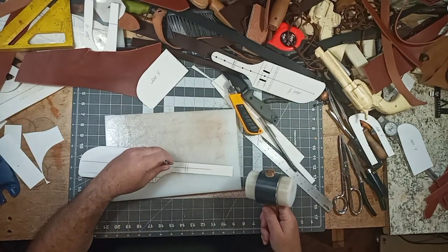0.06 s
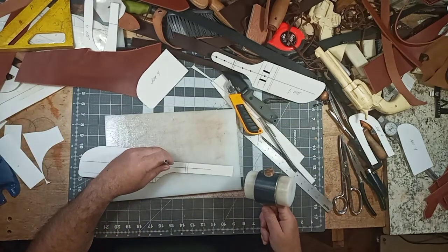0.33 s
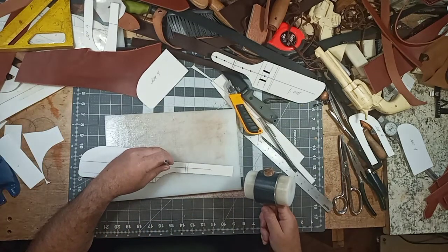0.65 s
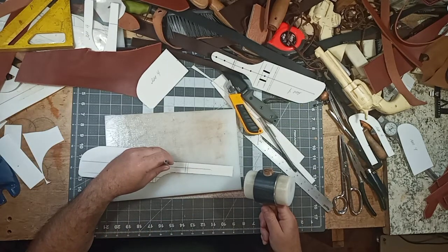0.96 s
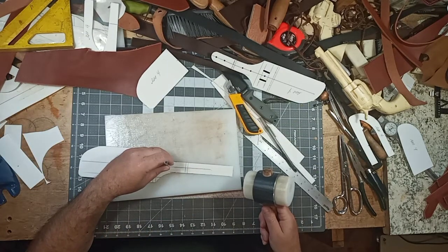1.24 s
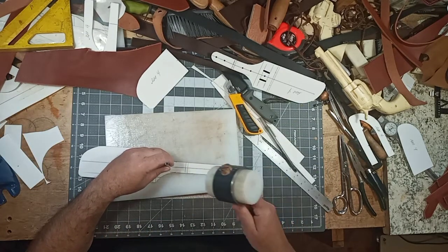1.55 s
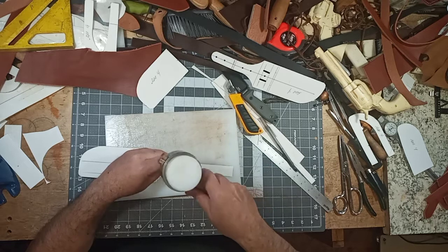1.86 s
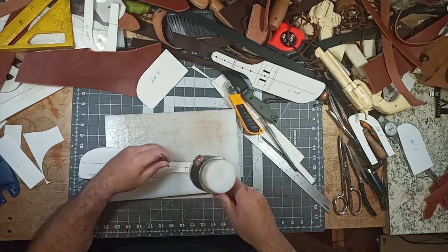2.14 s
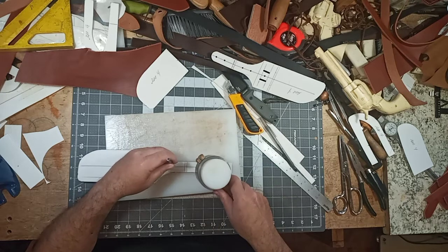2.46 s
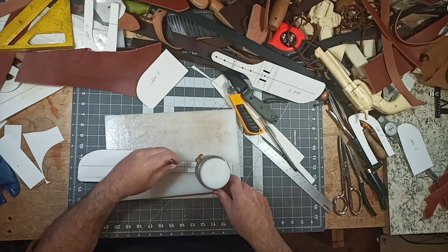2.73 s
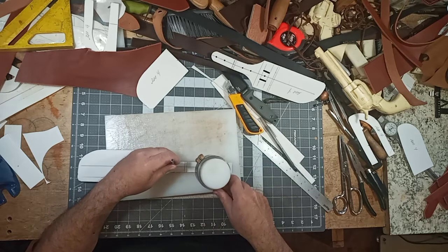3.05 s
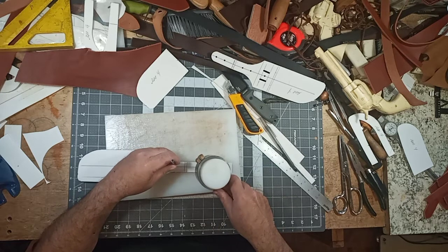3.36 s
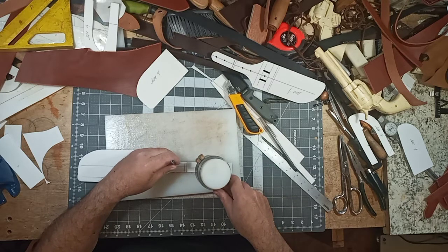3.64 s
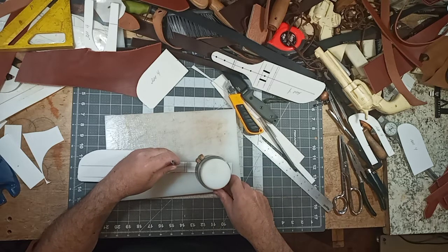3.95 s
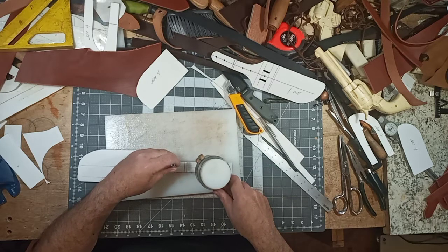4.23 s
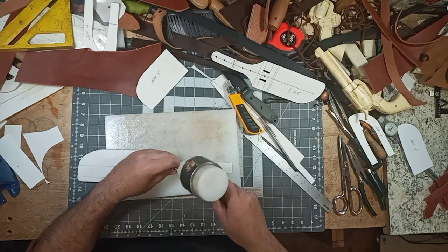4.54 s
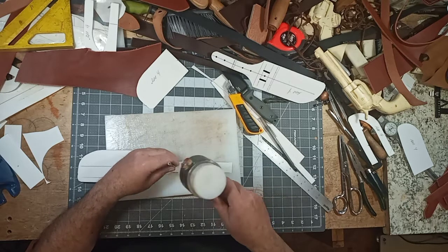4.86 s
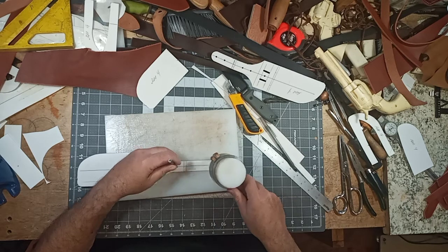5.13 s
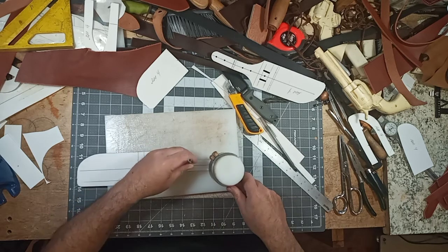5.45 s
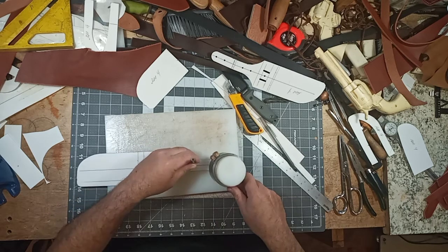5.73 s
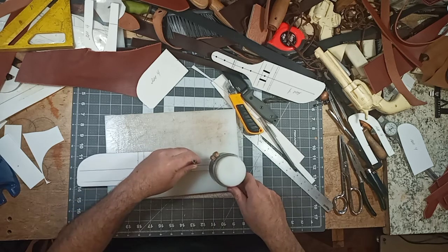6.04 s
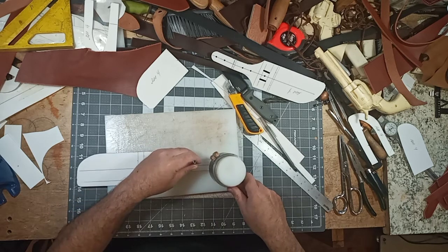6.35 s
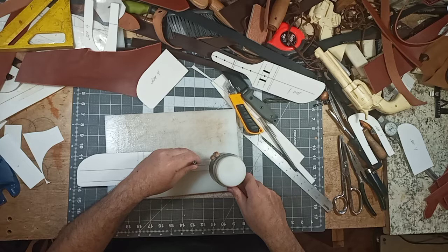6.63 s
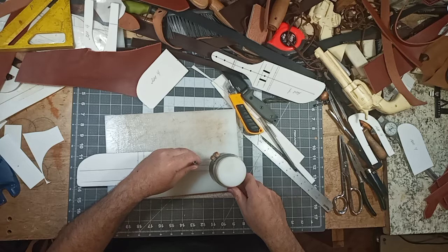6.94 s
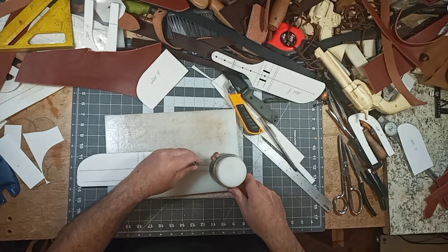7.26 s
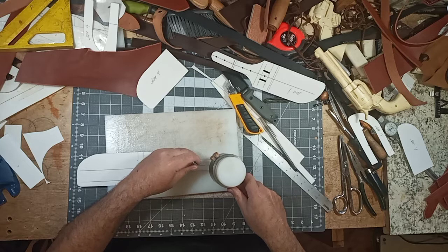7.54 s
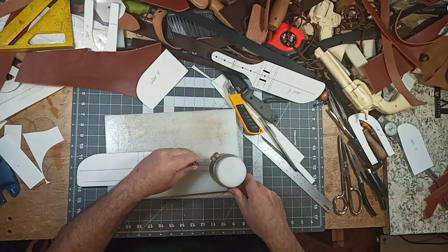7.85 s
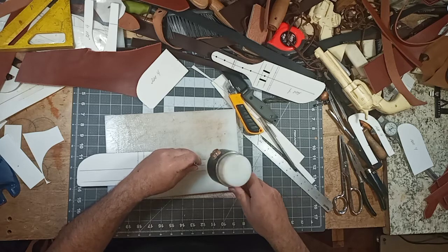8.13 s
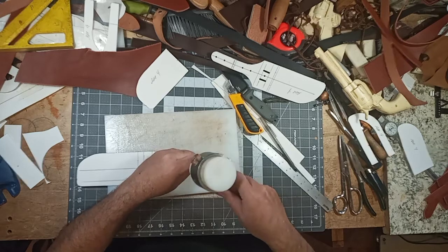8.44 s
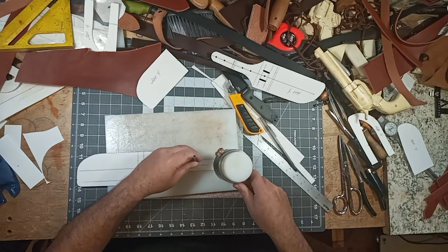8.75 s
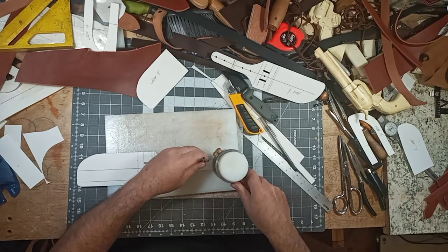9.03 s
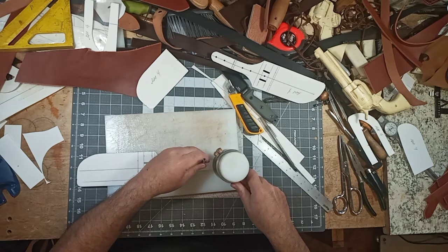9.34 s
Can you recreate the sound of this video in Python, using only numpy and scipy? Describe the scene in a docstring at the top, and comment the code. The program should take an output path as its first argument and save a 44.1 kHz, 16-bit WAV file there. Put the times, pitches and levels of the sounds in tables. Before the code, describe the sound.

A mallet strikes a steel punch through leather three times, with softer knocks as it is set down, over a faint fan hum.

```python
"""A mallet drives a steel hole punch through leather: three hard blows on a bench in a small workshop.
Each cracks, thumps the bench and shakes loose tools; then the mallet is stood back on the bench
and the punch is worked free with faint ticks. Across the room a fan hums and hisses, its whine
swelling about twice a second.
A microphone pair hears the bench; the left channel is slightly later and mostly louder."""
import sys
import numpy as np
from scipy import signal
from scipy.fft import rfft, irfft
from scipy.io import wavfile
from scipy.ndimage import uniform_filter1d

SR = 44100
rng = np.random.default_rng(int(sys.argv[2]) if len(sys.argv) > 2 else 0)


def master(y):
    """Save y as 16-bit WAV."""
    cut = np.clip(np.atleast_2d(y).T, -1, 1)
    pcm = np.round(cut * 32767)  # scale
    wavfile.write(sys.argv[1], SR, pcm.astype(np.int16))


N = 418420
T = np.arange(SR) / SR  # the second that follows a contact

# Levels are relative within each column; t60 is the time to fall 60 dB.
# mallet on punch: t/s, crack/dB, contact corner/Hz, bench thump/dB, room/dB, bottoming/dB,
# rebound delay/s, rebound/dB, board's note at that spot/Hz, its level/dB
MALLET_BLOWS = [(1.644, 4, 9000, -0.5, 1.5, -19, 0.051, -12.5, 153, -17),
                (4.5103, 3.5, 7000, -1.5, 1.5, -3.5, 0.046, -9.5, 174, -26),
                (8.2184, 2, 7900, 1, 3.5, -12, 0.039, -11, 284, -10)]
# tone colour of a blow's crack at the bench: f/Hz, level/dB
CRACK_COLOUR = [(88, -18), (130, 1), (175, -9), (240, -2), (309, -4), (1390, -19.5), (1900, -12),
                (2980, -24.5), (4860, -27), (5460, -25.5), (7470, -23.5), (8230, -32.5), (10400, -43),
                (12900, -35), (14800, -44), (16000, -59)]
# tone colour of the room's answer to a blow: f/Hz, level/dB
ANSWER_COLOUR = [(59, 3.5), (100, 3.5), (174, -17), (271, -9), (365, -8.5), (424, -16), (471, -11.5),
                 (513, -17), (558, -10), (1650, -17.5), (5300, -32.5), (10700, -34), (13200, -36),
                 (16000, -56)]
# modes of the struck bench top: f/Hz, level/dB, t60/s
BENCH_MODES = [(90.5, -28, 0.076), (122, -15, 0.05), (241, -22.5, 0.17), (330, -9.5, 0.036),
               (404, -13, 0.07), (541.6, -21.5, 0.14)]
# long rings of bench and room: f/Hz, level/dB, t60/s
BOOM_MODES = [(59.5, -47, 1), (73.35, -27, 0.71), (82.4, -22, 0.075), (102.5, -36, 0.95), (153, -44, 0.15),
              (193, -25, 0.38), (224.2, -25.5, 0.19), (275, -33, 0.35), (347, -76, 0.12), (338, -46, 0.37),
              (471, -27, 0.21), (496, -24, 0.15), (525, -28.5, 0.44), (600, -76, 0.11), (797, -28.5, 0.22)]
# loose tools on the bench, shaken by a blow: f/Hz, level/dB, t60/s
TOOL_MODES = [(930, -37, .25), (1066, -39, .25), (1187, -40, .28), (1632, -39, .28), (1924, -36, .25),
              (2103, -41, .26), (2461, -43, .26)]
# mallet set down, and its rocking:
# t/s, knock/dB, contact corner/Hz, bench thump/dB, sway/dB, room/dB, treble share/dB
MALLET_LANDINGS = [(2.2020, -5.5, 340, -2, -14, -1.5, -21.5), (4.948, -5.5, 6000, -7, -8, -3, -3),
                   (5.0250, -15.5, 2800, -8.5, -17.5, -19, -4), (8.664, 1, 4480, -10.5, -8.5, -3.5, -19)]
# tone colour of the mallet's knock on the board: f/Hz, level/dB
KNOCK_COLOUR = [(60, -21), (120, -7), (195, -18), (330, -6.5), (550, -7), (900, -7.5), (1200, -16),
                (1750, -9.5), (2400, -22), (3800, -24), (5200, -33.5), (7200, -24.5), (9000, -36),
                (10600, -42), (13000, -56)]
# the bench, damped by the weight of the resting mallet: f/Hz, level/dB, t60/s
LOADED_MODES = [(51, -27, 0.25), (68.8, -16.5, 0.23), (89.6, -25, 0.24), (126.5, -39, 0.12),
                (138.5, -30, 0.38), (217, -34, 0.13), (352, -27, 0.22)]
# small contacts of punch and leather: t/s, level/dB, centre f/Hz, t60/s
PUNCH_TICKS = [(2.094, -53, 7200, 0.18), (2.1968, -43.5, 7100, 0.11), (4.734, -49.5, 13000, 0.058),
               (4.85, -50.5, 10000, 0.055), (4.958, -33, 11600, 0.019), (8.436, -38.5, 14400, 0.027),
               (8.673, -46, 10600, 0.022)]
# the fan's air noise, mostly below 2 kHz: f/Hz, level/dB
DRONE_COLOUR = [(30, -49), (66, -7), (105, -12.5), (160, -18.5), (205, -7.5), (270, -5.5), (330, -10),
                (450, -20), (680, -16), (1000, -22.5), (1750, -15.5), (2400, -18), (3100, -53),
                (5000, -100)]
# the fan's air noise, mostly above 2 kHz: f/Hz, level/dB
HISS_COLOUR = [(1410, -14), (2400, -20), (2540, -4), (3120, -5), (3490, -4), (4980, -8.5), (7410, 2.5),
               (8150, -1.5), (9250, -18.5), (10600, -7.5), (10900, -9.5), (12600, -23), (13800, -24),
               (15200, -9.5), (16000, -17)]
# resonances that the fan's air stirs: f/Hz, level/dB, width/Hz
FAN_RESONANCES = [(304.4, -67, 29), (520.6, -81, 8.7), (636, -71, 49), (907, -69.5, 120), (1743, -68.5, 65),
                  (1986, -73, 66), (3093, -71, 93)]
# tones of the fan's motor and blades: f/Hz, level/dB
MOTOR_TONES = [(206.3, -69), (240, -64), (309.4, -68), (325.6, -76), (360, -74), (515.8, -79), (635.8, -79)]
# swells of the motor's whine: peak t/s, level/dB, width at half height/s
SWELLS = [(0.55, -57, 0.14), (1.248, -54.5, 0.23), (1.556, -62.5, 0.27), (2.157, -55.5, 0.097),
          (2.57, -56.5, .13), (2.955, -58.5, 0.14), (3.508, -59, 0.11), (3.975, -55.5, .2),
          (4.424, -64, 0.14), (4.893, -57, 0.14), (5.28, -55.5, .22), (5.73, -56.5, 0.16),
          (6.16, -62, 0.083), (6.708, -56, 0.089), (7.045, -60.5, 0.24), (7.48, -58.5, .16),
          (7.88, -63.5, 0.21), (8.11, -55.5, 0.093), (8.506, -61, 0.11), (9.03, -63, 0.1),
          (9.432, -61.5, 0.1)]
# brief surges of the fan's resonances: peak t/s, f/Hz, level/dB, width at half height/s
FAN_SURGES = [(0.41, 305, -53, .08), (0.54, 307, -52, .04), (0.80, 298, -53.5, .04),
              (1.99, 1990, -65.5, .18), (2.44, 305, -54, .07), (2.754, 308, -53.5, .1),
              (3.287, 310, -53, .04), (3.60, 302, -54.5, 0.056), (3.91, 300.4, -50, 0.094),
              (4.45, 312, -52, .04), (4.90, 300, -51, 0.044), (5.22, 3120, -65, .2),
              (5.868, 304.4, -55.5, .07), (6.079, 309, -52.5, .04), (6.23, 3140, -64, .11),
              (6.56, 310, -48.5, 0.047), (6.58, 3100, -64, 0.15), (8.54, 3110, -64, 0.2),
              (8.798, 304, -53, .05), (8.87, 512, -60, .09)]
# ring time of the workshop: f/Hz, t60/s
ROOM_T60 = [(60, 0.4), (250, 0.26), (700, 0.2), (2000, 0.2), (5000, 0.22), (9000, 0.22), (15000, 0.1)]
# the bench at the microphones, left minus right: f/Hz, level/dB
BENCH_BALANCE = [(60, 5), (200, 2), (600, 3.5), (1200, 4), (2400, 8), (4200, 4.5), (5500, 2), (7600, 19),
                 (8500, 6), (9400, 5), (10600, -19), (12200, -7), (15000, 0)]
# the fan at the microphones, left minus right: f/Hz, level/dB
FAN_BALANCE = [(60, 5.5), (200, 6), (310, 1), (720, 7.5), (1300, 5), (2000, 6.5), (3200, 7), (5000, 5),
               (7500, 21.5), (8500, 33), (9400, -13), (10600, -9.5), (12200, -8), (14500, 5)]
# the microphone ports colour the ticks' top octave: f/Hz, level/dB
MIC_PORT_COLOUR = [(7500, 3.5), (9000, -10), (10600, 7.5), (13000, -10), (15200, 2)]

REBOUND_THUMP_DB, BOARD_T60_S = 3, 0.11
DRONE_DB, HISS_DB = -58.5, -57
WOBBLE_DB, WOBBLE_BELOW_HZ = 2.2, 580
WHINE_HZ, WHINE_REST_DB = 720, -68
WHINE_AIR_HZ, WHINE_AIR_DB = 731, -6  # rough air that swells with the whine
ROTOR_HZ, FLUTTER_DB = 17.1, 3.5
SURGE_WANDER = 0.0131  # share of the pitch
BAND_LIMIT_HZ = 16000


def blows(walls):
    """Close by, the punch cuts through, bottoms on the board and rebounds; the bench thumps and booms."""
    out = np.zeros((2, N))
    bottoming = np.interp(T - .0065, T, fade(t60=0.0037), left=0)
    rings = ring(BOOM_MODES, rise_s=0.0071) + amp(1.5) * ring(TOOL_MODES, rise_s=0.0064)
    top = mic_pair(stereo(ring(BENCH_MODES, rise_s=0.002)), lag_ms=1.27)
    thump = top + mic_pair(stereo(rings), lag_ms=0.84)
    for (s, db, corner_hz, thump_db, room_db, bottom_db,
         rebound_s, rebound_db, board_hz, board_db) in MALLET_BLOWS:
        soft_db = softened(corner_hz, treble_db=-18)
        crack_db = db + 9 + read(CRACK_COLOUR, bins(T)) + soft_db
        answer_db = room_db + 2 + read(ANSWER_COLOUR, bins(T)) + soft_db
        rebound = np.interp(T - rebound_s, T, fade(t60=0.07), left=0)
        shape = fade(t60=0.061) + amp(bottom_db) * bottoming + amp(rebound_db - 2.5) * rebound
        add(out, s, contact(walls, shape, crack_db, answer_db, hold_s=0.11))
        add(out, s, amp(thump_db) * thump + steel_click(click_db=-45, spray_db=-36))
        board = ring([(board_hz, board_db, BOARD_T60_S)], rise_s=0.009)
        add(out, s, mic_pair(stereo(board), lag_ms=0.67))
        add(out, s + rebound_s, amp(rebound_db + REBOUND_THUMP_DB) * top)
    return out


def contact(walls, shape, crack_db, answer_db, hold_s):
    """A close crack with the given envelope and the room's answer, each with its colour (dB per bin)."""
    burst = noise_pair(SR, alike=0.91) * shape * (1 - np.exp(-T / 0.00019))
    # each contact reaches the walls a little differently
    paths = unit(walls + amp(3) * echoes(alike=0.37, uneven_db=3.5))
    tail = room_tail(paths, gap_s=0.0094, hold_s=hold_s, low_hz=127)
    direct = mic_pair(colour(burst, crack_db), lag_ms=0.98)
    return direct + mic_pair(colour(tail, answer_db), lag_ms=0.652)


def softened(corner_hz, treble_db, order=2):
    """A long contact loses the treble above its corner, down to the share the surfaces scrape up (dB)."""
    passed_power = 1 / (1 + (bins(T) / corner_hz) ** (2 * order))
    return 10 * np.log10(passed_power + amp(treble_db) ** 2)


def steel_click(click_db, spray_db):
    """The steel shank adds a very high click, which the room scatters."""
    upper = band(noise_pair(SR, alike=.3), hz=15100, octaves=0.089)
    lower = band(noise_pair(SR, alike=0.78), hz=10550, octaves=0.11)
    shape = amp(click_db) * fade(t60=0.0099) + amp(spray_db) * fade(t60=0.25)
    return mic_pair((upper + amp(-1.5) * lower) * shape, lag_ms=0.83)


def landings(walls):
    """The mallet's head knocks on the cutting board and stays there, so the bench sways and soon stops."""
    out = np.zeros((2, N))
    for s, db, corner_hz, thump_db, sway_db, room_db, treble_db in MALLET_LANDINGS:
        soft_db = softened(corner_hz, treble_db, order=4)
        knock_db = read(KNOCK_COLOUR, bins(T)) + soft_db
        knock = contact(walls, fade(t60=0.044), knock_db + db + 8, knock_db + room_db + 1, hold_s=0.0073)
        add(out, s, knock)
        thump = amp(thump_db) * ring(BENCH_MODES, rise_s=0.0016)
        sway = amp(sway_db + 8.5) * ring(LOADED_MODES, rise_s=0.027)
        add(out, s, mic_pair(stereo(colour(thump + sway, soft_db)), lag_ms=1.0))
    return out


def punch_ticks():
    """Close and faint, the punch ticks and scrapes as it is worked out of the leather."""
    out = np.zeros((2, N))
    for s, db, hz, t60 in PUNCH_TICKS:
        attack = 1 - np.exp(-T / (0.015 * t60))
        decay = fade(t60) + amp(-11.5) * fade(t60=0.18)
        scrape = band(noise_pair(SR, alike=0.27), hz, octaves=0.37)
        scrape = colour(scrape, read(MIC_PORT_COLOUR, bins(T)))
        add(out, s, mic_pair(amp(db) * attack * decay * scrape, lag_ms=0.75))
    return out


def fan():
    """Air noise, hum and whine from across the room; the low drone and the motor tones wobble together."""
    hz = np.fft.rfftfreq(N, 1 / SR)
    wobble = amp(WOBBLE_DB * drift(N, size=2000))
    drone = unit(irfft(rfft(noise_pair(N, alike=0.46)) * amp(read(DRONE_COLOUR, hz))))
    low_drone = irfft(rfft(drone) / (1 + (hz / WOBBLE_BELOW_HZ) ** 4))
    drone += (wobble - 1) * low_drone
    air = across_room(rng.standard_normal(N), wet_db=-4, t60=.15) + noise_pair(N, alike=.45)
    hiss = unit(irfft(rfft(air) * amp(read(HISS_COLOUR, hz))))
    hum = np.zeros(N)
    for centre_hz, db, width_hz in FAN_RESONANCES:
        peak = 1 / (1 + (2 * (hz - centre_hz) / width_hz) ** 2)
        hum += amp(db) * unit(irfft(rfft(rng.standard_normal(N)) * peak))
    motor = sum(amp(db) * tone(tone_hz, N) for tone_hz, db in MOTOR_TONES)
    hum += wobble * motor + whine()
    rush = mic_pair(amp(DRONE_DB) * drone + amp(HISS_DB) * hiss, lag_ms=0.662, balance=FAN_BALANCE)
    return rush + mic_pair(hum + surges(), lag_ms=0.42, balance=FAN_BALANCE)


def whine():
    """The motor's whine swells and sinks back, and flutters once per turn of the rotor."""
    t = np.arange(0, N / SR, .005)
    swells = sum(amp(db) * arch(t - s, width_s) for s, db, width_s in SWELLS)
    level = np.interp(np.arange(N) / SR, t, amp(WHINE_REST_DB) + swells)
    rotor_hz = ROTOR_HZ * (1 + 0.222 * drift(N, size=3000))
    flutter = amp(FLUTTER_DB * tone(rotor_hz, N) - 1.5)
    air = amp(WHINE_AIR_DB) * band(rng.standard_normal(N), WHINE_AIR_HZ, octaves=0.065)
    pitch_hz = WHINE_HZ + 4 * drift(N, size=400)
    return level * flutter * (tone(pitch_hz, N) + air)


def surges():
    """Now and then one of the fan's resonances swells and sinks back, wavering in pitch."""
    out = np.zeros((2, N))
    for s, hz, db, width_s in FAN_SURGES:
        pitch_hz = hz * (1 + SURGE_WANDER * drift(SR, size=300))
        surge = amp(db) * arch(T - width_s, width_s) * tone(pitch_hz, SR)
        add(out, max(s - width_s, 0), stereo(surge))
    return out


def across_room(x, wet_db, t60):
    """A distant source: its direct sound and each microphone's own reflections."""
    response = rng.standard_normal((2, SR)) * fade(t60)
    response *= amp(wet_db) / np.linalg.norm(response[0])
    response[:, 0] += 1
    return irfft(rfft(x) * rfft(response, N))


def echoes(alike, uneven_db):
    """Dense reflections off the workshop walls, uneven in strength."""
    lumps = unit(uniform_filter1d(rng.standard_normal(SR), size=40))
    return unit(noise_pair(SR, alike) * amp(uneven_db * lumps))


def room_tail(walls, gap_s, hold_s, low_hz):
    """Reflections above low_hz: strong while the first walls answer, then each band dies at its speed."""
    hz, t, spectra = signal.stft(walls, SR, nperseg=256)
    age = np.hypot(t, hold_s) - hold_s
    decay = np.exp(-np.log(1000) * age / read(ROOM_T60, hz)[:, None])
    tail = signal.istft(spectra * decay, SR, nperseg=256)[1][:, :SR]
    return low_cut(tail * (1 - np.exp(-(T / gap_s) ** 2)), low_hz)


def mic_pair(pair, lag_ms, balance=BENCH_BALANCE):
    """Long waves reach both microphones alike; the left channel is later and mostly louder."""
    hz, spectra = bins(pair), rfft(pair)
    apart = hz / np.hypot(hz, 350)
    mid = spectra.mean(0)
    spectra = mid + apart * (spectra - mid)
    lean = amp(read(balance, hz))
    left = lean * np.exp(-2j * np.pi * hz * lag_ms / 1000)
    gains = np.array([left, np.ones(len(hz))])
    return irfft(spectra * gains * np.sqrt(2 / (1 + lean ** 2)))


def ring(modes, rise_s):
    """Dying sines that take a moment to build up."""
    sines = sum(amp(db - 60 * T / t60) * np.sin(2 * np.pi * hz * T) for hz, db, t60 in modes)
    return sines * (1 - np.exp(-(T / rise_s) ** 2))


def tone(hz, samples):
    """A sine at rms 1 that follows a pitch or a pitch curve."""
    return np.sqrt(2) * np.sin(2 * np.pi * (np.cumsum(hz * np.ones(samples)) / SR + rng.random()))


def noise_pair(size, alike):
    """Two white noises that have the share alike of their power in common."""
    common, own = rng.standard_normal(size), rng.standard_normal((2, size))
    return np.sqrt(alike) * common + np.sqrt(1 - alike) * own


def drift(samples, size):
    """A slow random wander at rms 1, smoothed twice over size samples."""
    return unit(uniform_filter1d(uniform_filter1d(rng.standard_normal(samples), size), size))


def fade(t60):
    """Falls 60 dB in t60 seconds."""
    return np.exp(-np.log(1000) * T / t60)


def arch(t, width_s):
    """A smooth swell around t = 0, width_s wide at half its height."""
    return np.cos(np.pi / 2 * np.clip(t / width_s, -1, 1)) ** 2


def colour(x, gain_db):
    """Minimum-phase filter with the given gain per bin: nothing sounds before the contact."""
    cepstrum = irfft(np.log(amp(np.maximum(gain_db, -100))))
    half = len(cepstrum) // 2
    cepstrum[1:half] *= 2
    cepstrum[half + 1:] = 0
    return irfft(rfft(x) * np.exp(rfft(cepstrum)))


def band(x, hz, octaves):
    """A bell-shaped band around hz, at rms 1."""
    bell = np.exp(-.5 * (np.log2((bins(x) + 1) / hz) / octaves) ** 2)
    return unit(irfft(rfft(x) * bell))


def low_cut(x, hz):
    """Rolls off the bass below hz."""
    return signal.sosfilt(signal.butter(2, hz, "high", fs=SR, output="sos"), x)


def read(points, hz):
    """Reads a table on a log-frequency axis."""
    f, value = np.transpose(points)
    return np.interp(np.log(hz + 1), np.log(f + 1), value)


def bins(x):
    """Frequencies of the spectrum of x."""
    return np.fft.rfftfreq(x.shape[-1], 1 / SR)


def amp(db):
    """Decibels to gain."""
    return 10 ** (np.asarray(db) / 20)


def unit(x):
    """Scales to rms 1."""
    return x / np.sqrt(np.mean(x ** 2) + 1e-20)


def stereo(x):
    """The same signal left and right."""
    return np.array([x, x])


def add(mix, s, sound):
    """Mixes in the first three quarters of a second of a stereo sound at time s."""
    part = mix[:, round(s * SR):][:, :SR * 3 // 4]
    part += sound[:, :part.shape[1]]


def scene():
    """Mallet and punch close on the bench, the fan across the same room."""
    walls = echoes(alike=0.1, uneven_db=0.5)
    return blows(walls) + landings(walls) + punch_ticks() + fan()


def record(dry):
    """The microphones lose the deep bass and round off loud peaks; then the band limit."""
    rounded = 1.2 * np.tanh(low_cut(dry, hz=44) / 1.2)
    low_pass = signal.firwin(511, BAND_LIMIT_HZ, window=("kaiser", 9), fs=SR)
    return signal.oaconvolve(rounded, low_pass[None], "same")


dry = scene()
out = record(dry)
master(out)
```